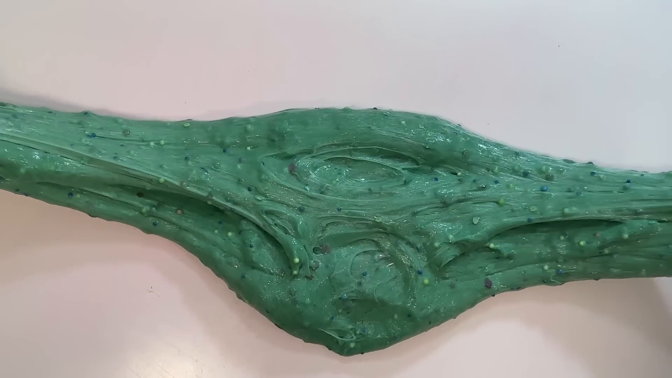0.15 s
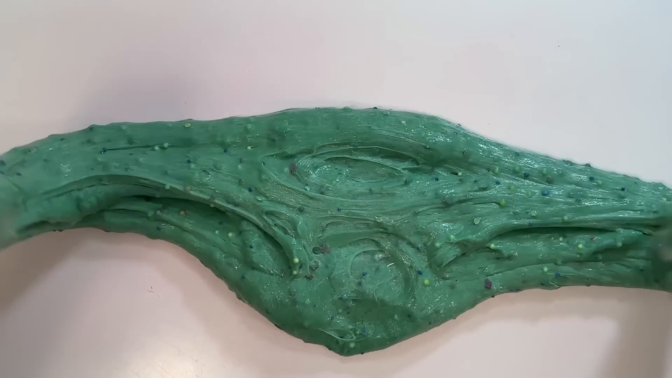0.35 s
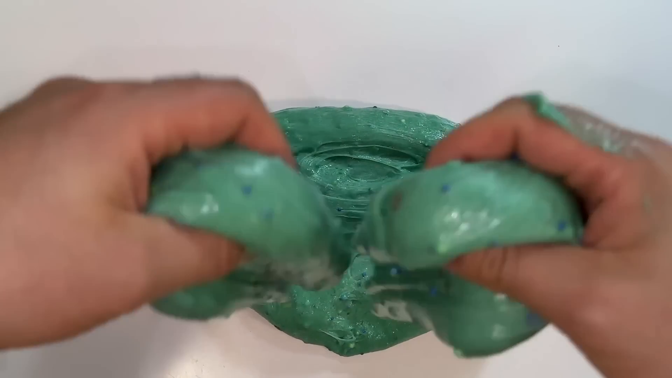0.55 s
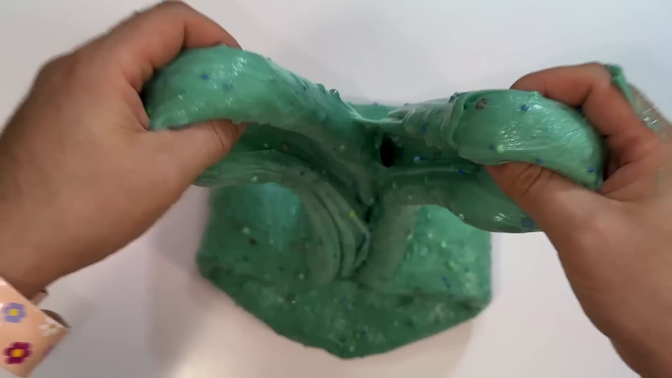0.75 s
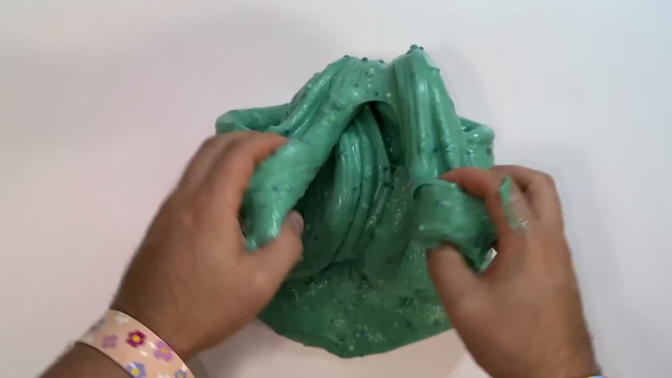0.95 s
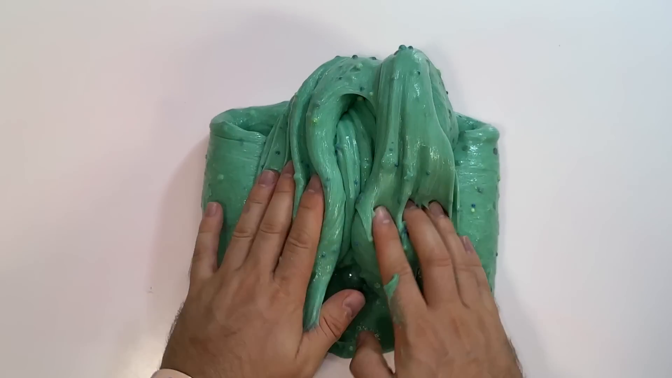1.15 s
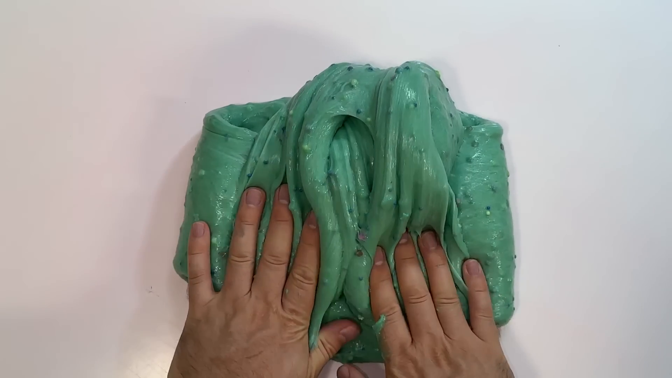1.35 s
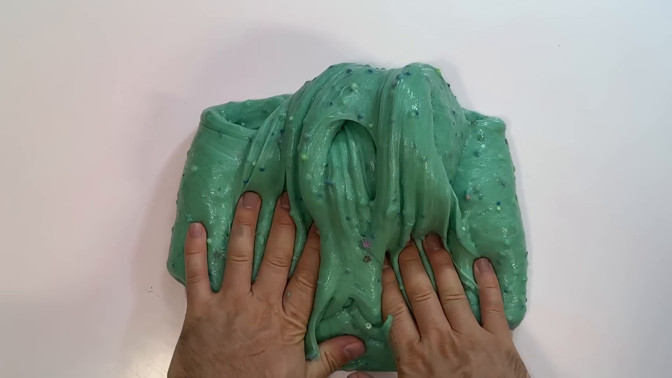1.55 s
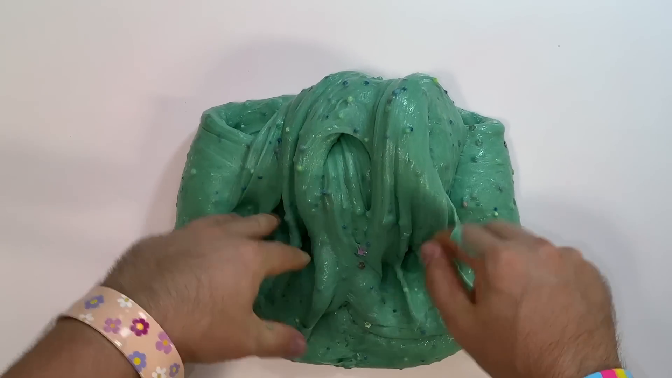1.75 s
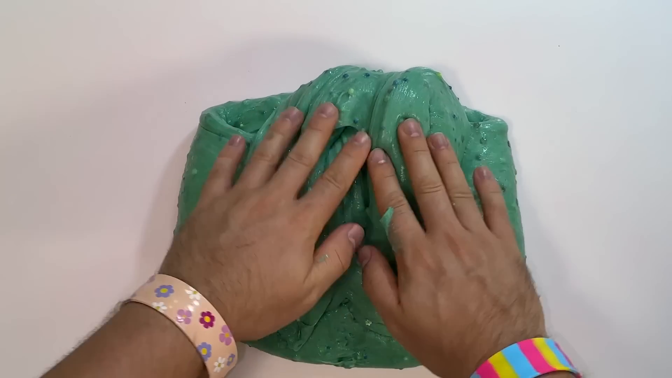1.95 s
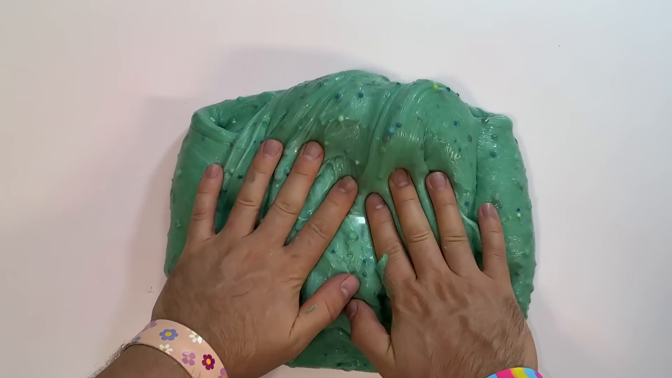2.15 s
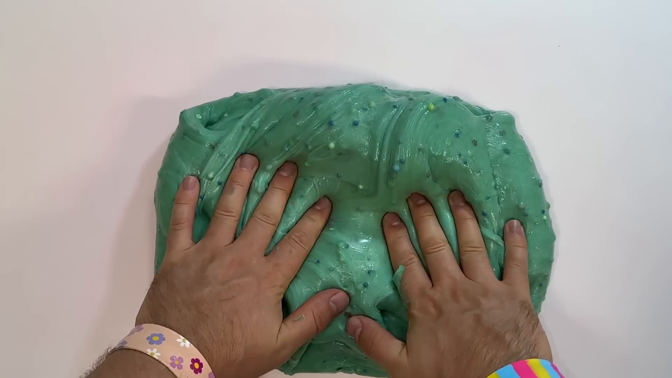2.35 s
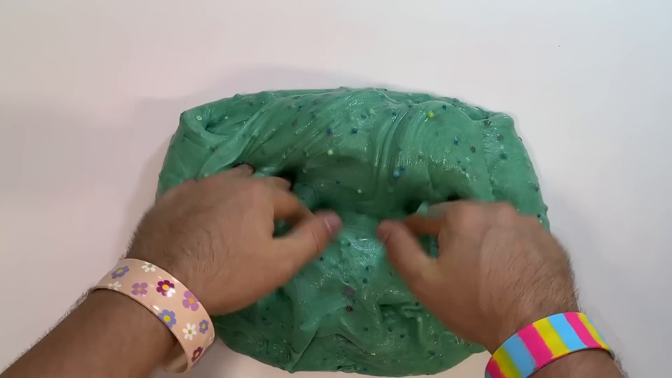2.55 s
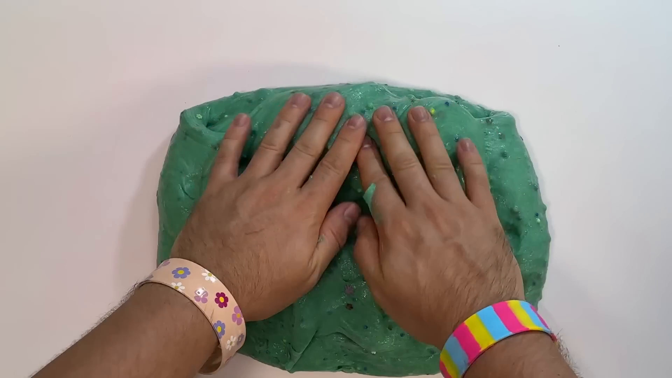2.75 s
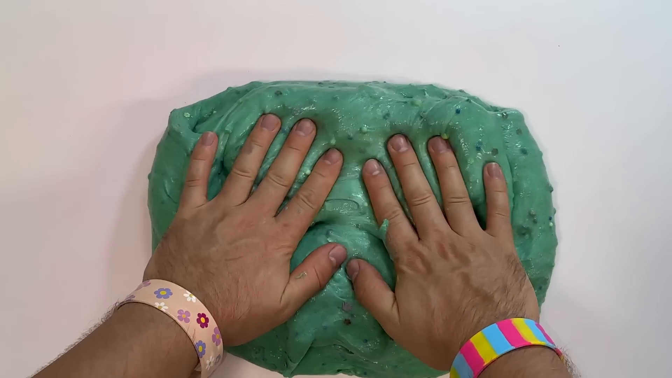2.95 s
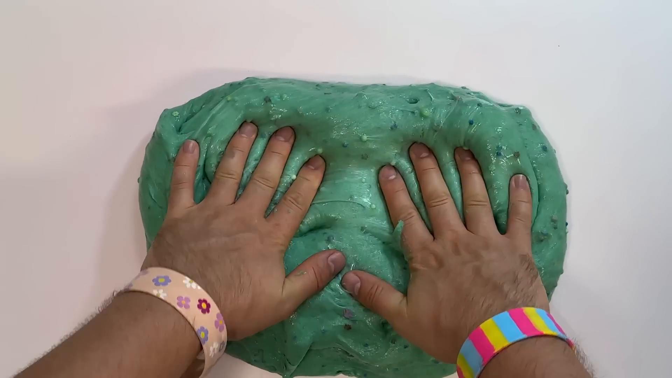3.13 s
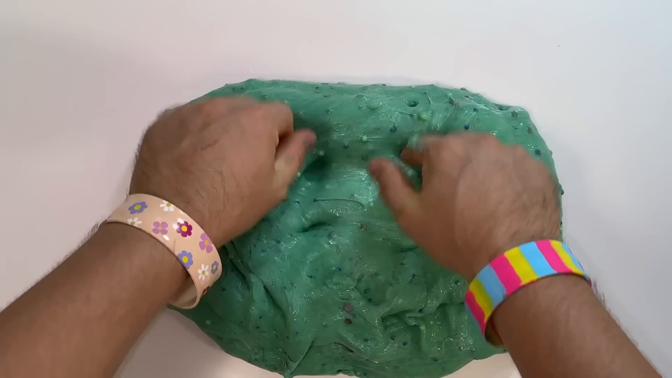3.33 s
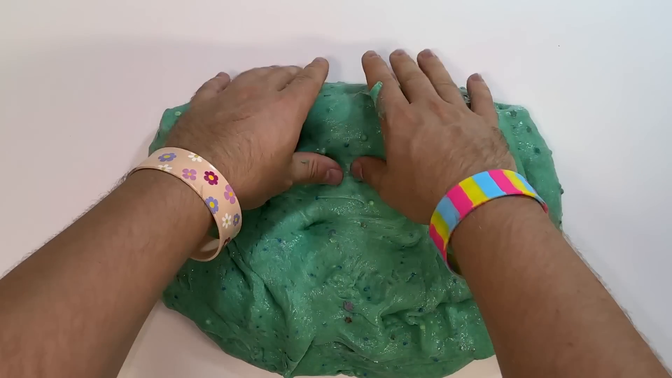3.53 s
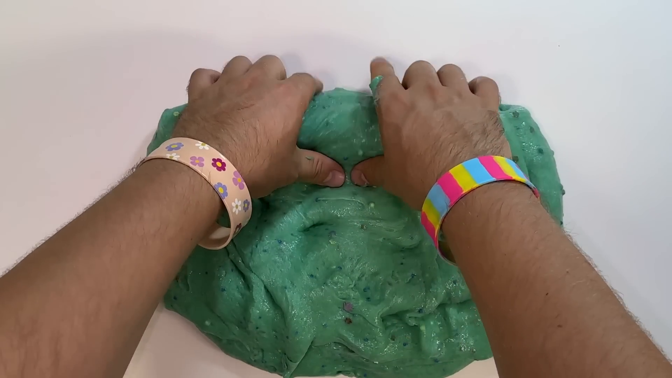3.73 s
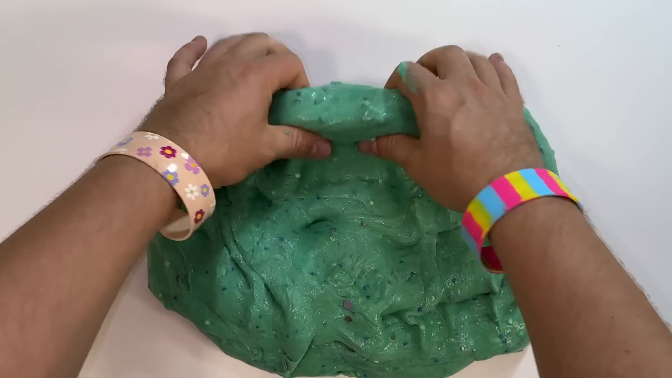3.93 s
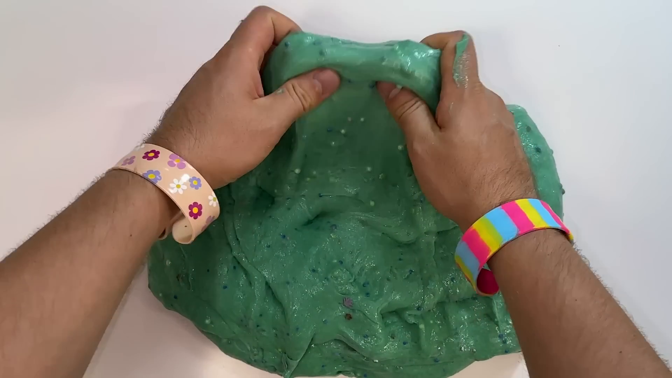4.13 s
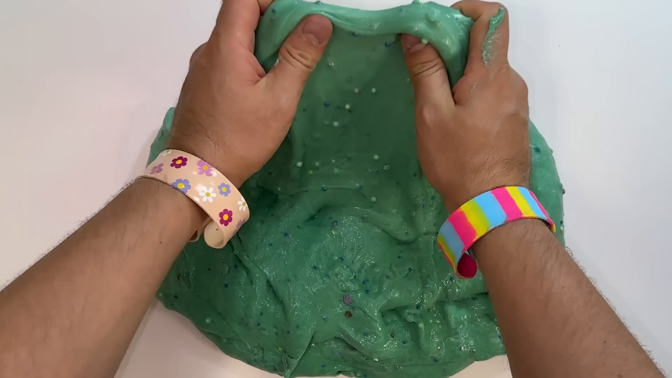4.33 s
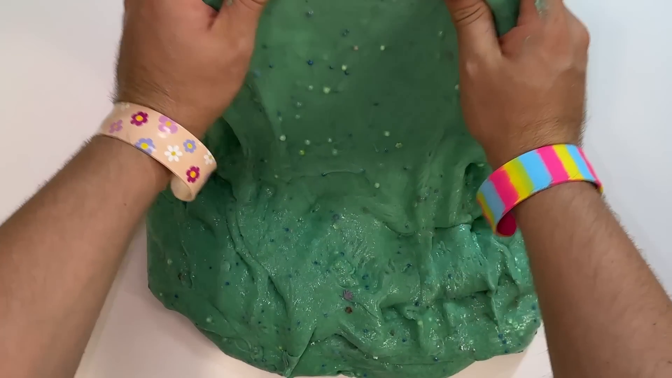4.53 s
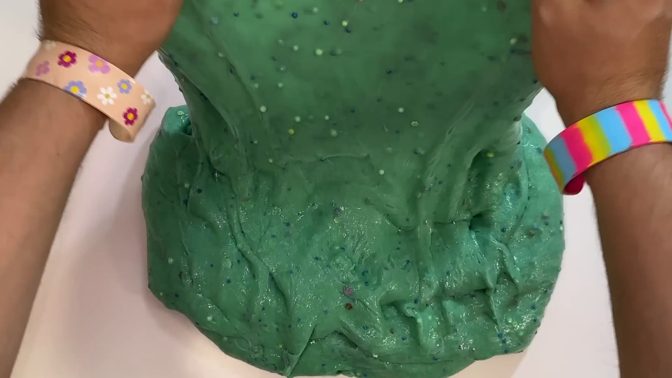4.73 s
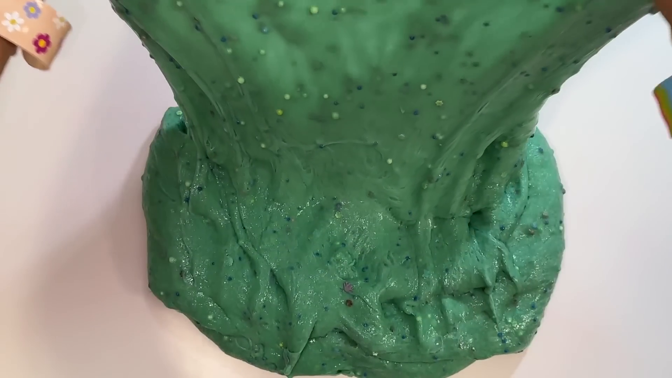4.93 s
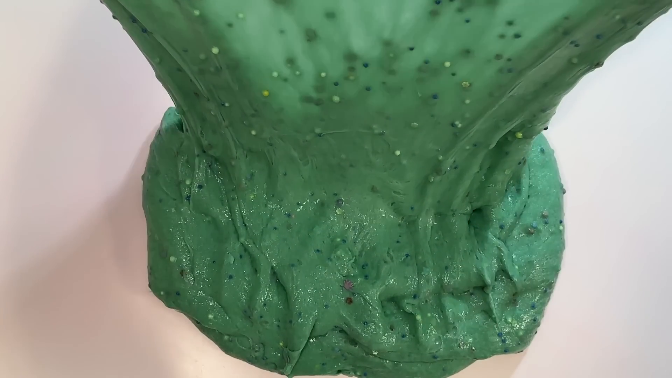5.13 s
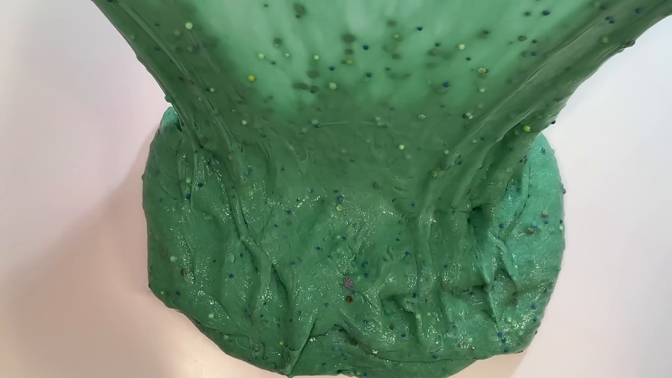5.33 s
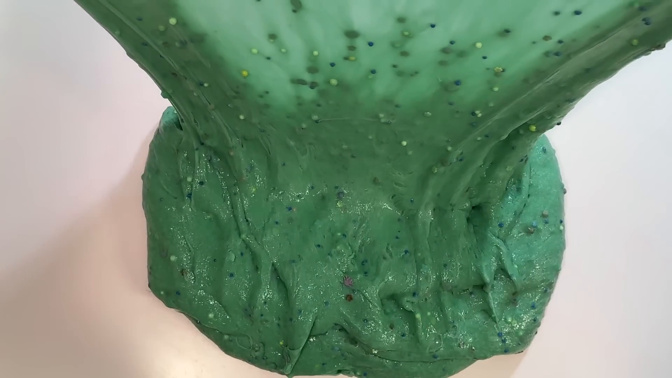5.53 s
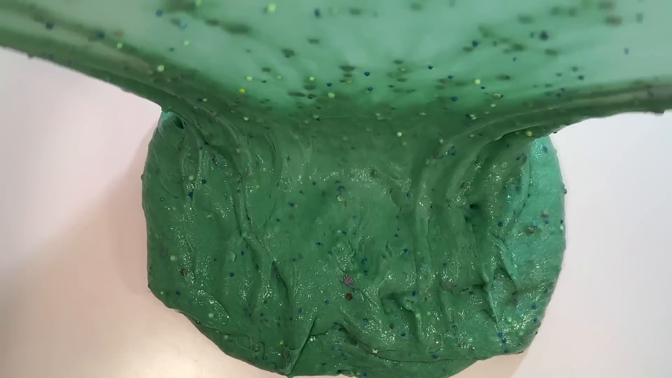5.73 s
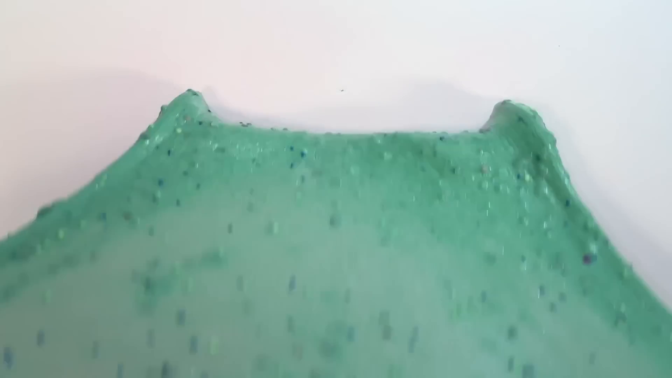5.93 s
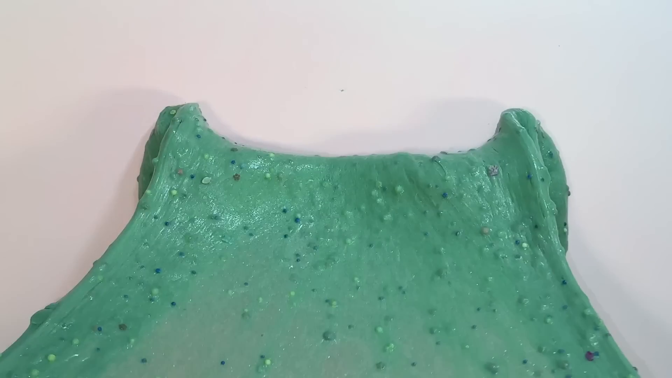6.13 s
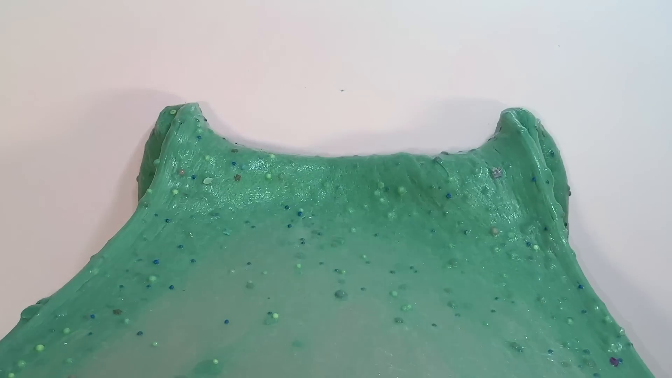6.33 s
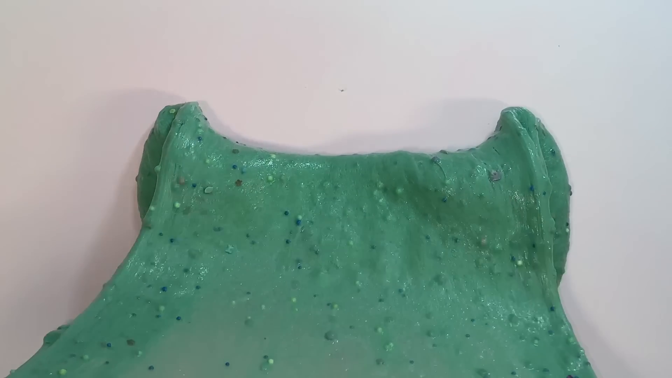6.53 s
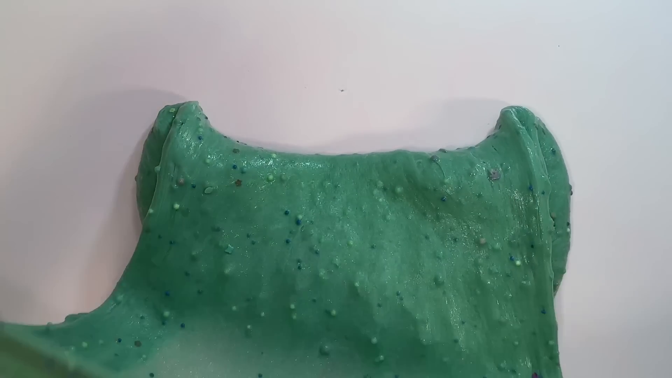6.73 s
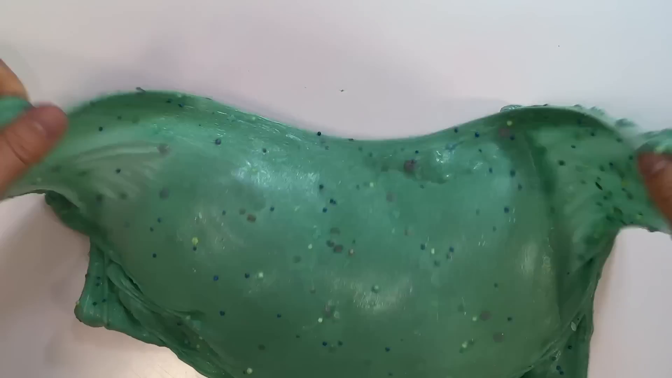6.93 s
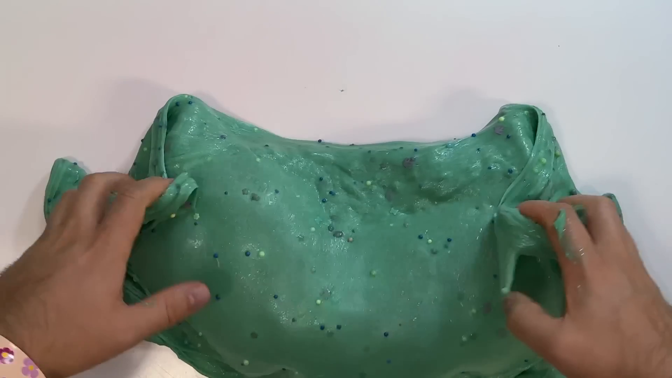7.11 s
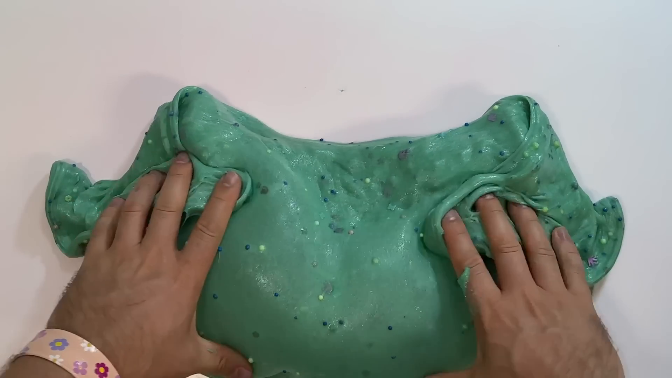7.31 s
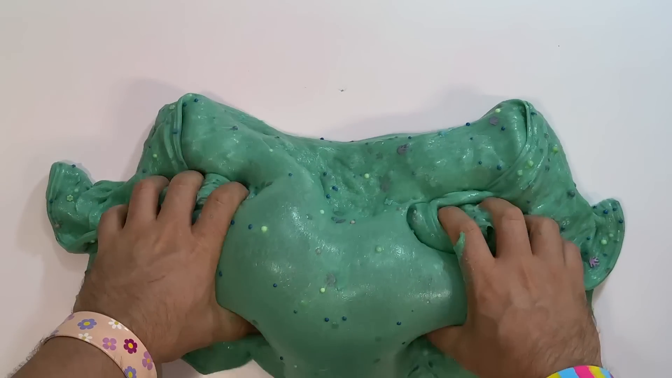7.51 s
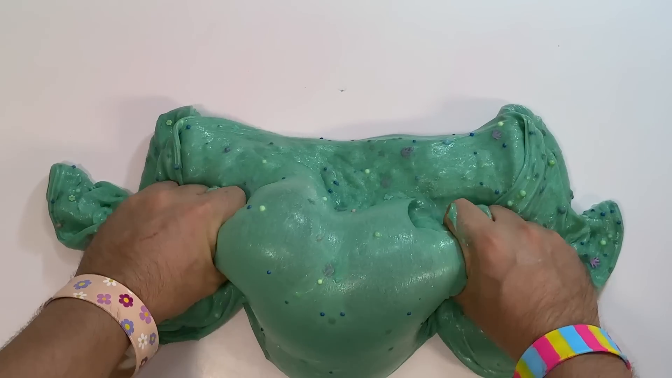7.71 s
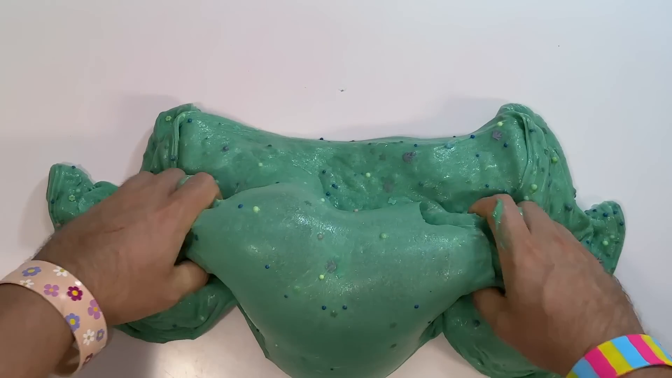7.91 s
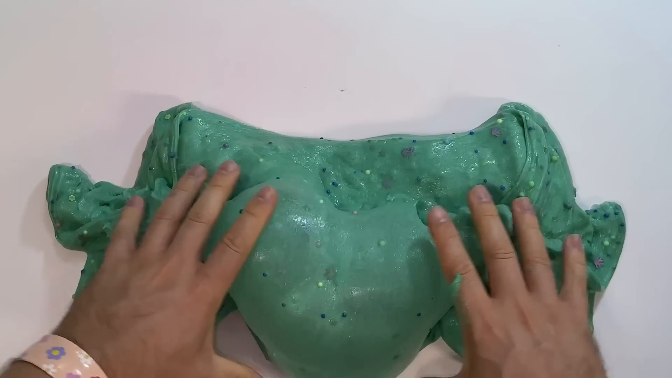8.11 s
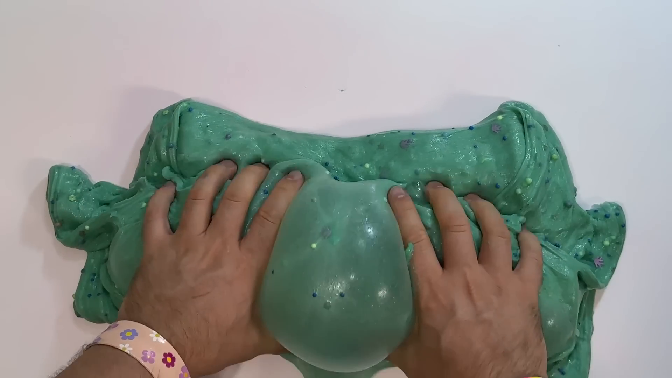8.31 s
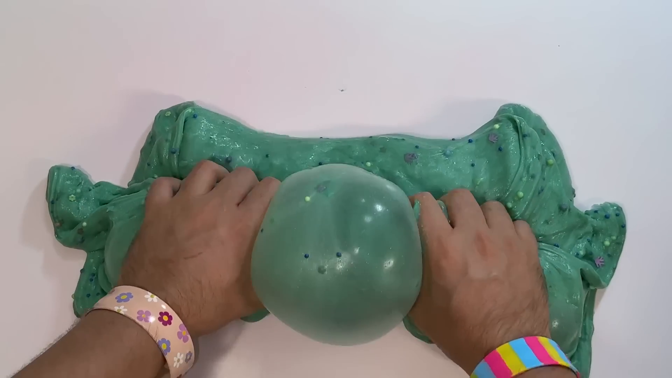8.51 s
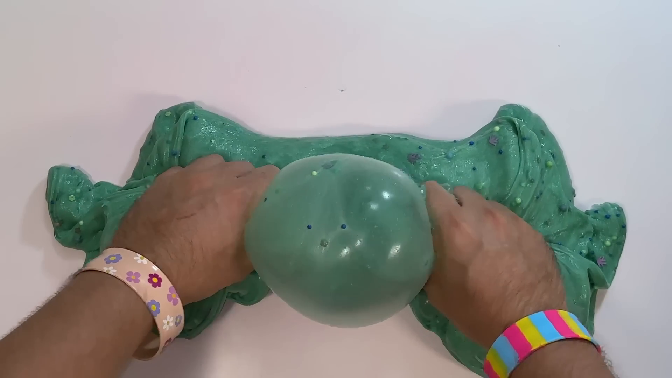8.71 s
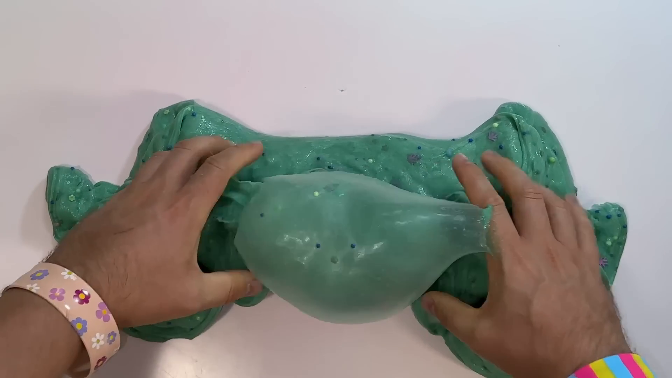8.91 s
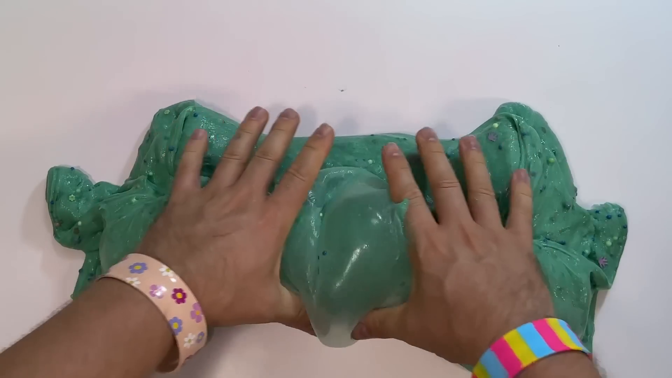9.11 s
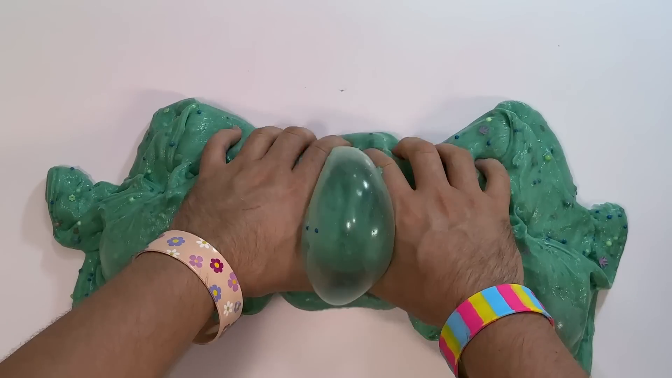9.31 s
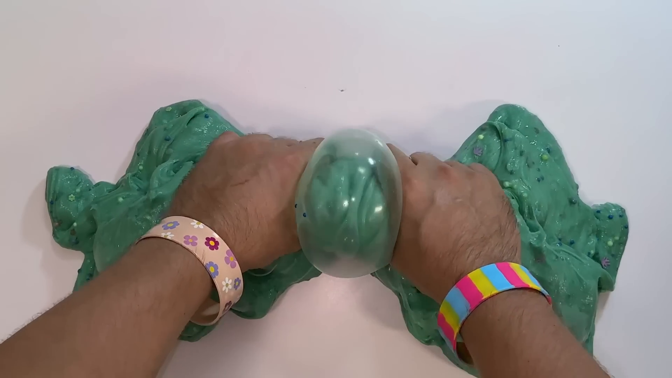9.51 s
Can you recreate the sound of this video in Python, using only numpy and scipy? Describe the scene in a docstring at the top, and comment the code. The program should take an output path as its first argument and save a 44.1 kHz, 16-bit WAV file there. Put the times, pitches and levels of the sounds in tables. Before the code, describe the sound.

Hands knead and stretch sticky beaded slime on a table, with wet crackles, soft squelches and plops, then very loud sharp air-bubble pops near the end.

```python
"""Two hands fold, press and stretch a soft foamy slime on a table in a quiet room.
Peeling sticky skin fizzes with tiny bubbles, made of random clicks and short rings; larger folds squelch.
Trapped air pockets burst with sharp ringing pops, and sliding folds colour their crackle in a hollow.
Fingers pulling out of their holes plop: a dying tone roughened by a puff of air.
Close microphones add hiss and rumble; the room adds an echo, a whine, a drone and a passing hum."""
import sys
import numpy as np
from scipy import signal
from scipy.fft import rfft, irfft, next_fast_len
from scipy.io import wavfile

SR = 44100
rng = np.random.default_rng(int(sys.argv[2]) if len(sys.argv) > 2 else 0)


def wav_record(signal):
    """Record a signal, one row per channel, as 16-bit PCM in the file named by sys.argv[1]."""
    frames = np.transpose(np.atleast_2d(signal))
    bounded = np.clip(frames, -1, 1)
    # unit amplitude maps onto the largest positive 16-bit level
    quanta = np.round(bounded * 32767).astype(np.int16)
    wavfile.write(sys.argv[1], SR, quanta)


N = 421596


def from_db(db):
    """Turn decibels into gain."""
    return 10 ** (np.asarray(db) / 20)


def rms_one(x):
    """Scale a sound so that its average strength (rms) is 1."""
    return x / np.sqrt(np.mean(x ** 2) + 1e-20)


def in_time(rows):
    """Turn table columns into curves with one value per sample."""
    s, *columns = np.transpose(rows)
    return [np.interp(np.arange(N) / SR, s, column) for column in columns]


def at_hz(points, hz):
    """Read a table of points at any frequency, along a log-frequency axis."""
    table_hz, value = np.transpose(points)
    return np.interp(np.log(hz), np.log(table_hz), value)


def drift(rate_hz):
    """Slow random wandering with spread 1: noise smoothed twice, made once every 40 samples."""
    r = np.exp(-2 * np.pi * rate_hz * 40 / SR)
    noise = rng.standard_normal(N // 40 + 2002)
    slow = signal.lfilter([1], [1, -2 * r, r * r], noise)[2000:]   # skip the filter's start-up
    return np.interp(np.arange(N) / 40, np.arange(len(slow)), rms_one(slow))


def ring(clicks, hz, t60_s):
    """Each click sets off a sine wave as high as the click, which falls by 60 dB in t60_s."""
    r, w = from_db(-60 / (t60_s * SR)), 2 * np.pi * hz / SR
    return signal.lfilter([0, np.sin(w)], [1, -2 * r * np.cos(w), r * r], clicks + 1e-18)


def grains(per_s, spread_db):
    """Random clicks of uneven size and sign, like many tiny breaks in the skin."""
    sizes = from_db(spread_db * np.minimum(rng.exponential(1, N), 5))
    sizes = sizes * rng.choice([-1, 1], N)
    return rms_one(sizes * (rng.random(N) < per_s / SR))


def stereo(mid, side, spectrum, alike):
    """Colour two streams and mix them so that left and right agree as far as asked; rms 1."""
    size = next_fast_len(N)
    hz = np.maximum(np.fft.rfftfreq(size, 1 / SR), 1)
    likeness = np.clip(at_hz(alike, hz), -1, 1)
    m = rfft(mid, size) * np.sqrt(1 + likeness)
    s = rfft(side, size) * np.sqrt(1 - likeness)
    colour = from_db(at_hz(spectrum, hz))
    return rms_one(irfft(colour * np.array([m + s, m - s]), size)[:, :N])


def dying(times_s, levels_db, t60_s):
    """A gain that jumps up at each time and falls by 60 dB in t60_s."""
    starts = np.zeros(N)
    starts[(np.asarray(times_s) * SR).astype(int)] = from_db(levels_db)
    return signal.lfilter([1], [1, -from_db(-60 / (t60_s * SR))], starts + 1e-18)


# The slime creeping between strokes: start_s, fizz_db
CREEP = [(0.0, -88), (.4, -79), (3.5, -80), (4.2, -74.5), (5.0, -82.5), (5.5, -83.5), (6.8, -83),
         (7.3, -74.5), (9.56, -77)]
CREEP_SQUELCH_DB, CREEP_THUD_DB = -2.5, -1.5   # against the creeping fizz
# Each press, pull or peel of the hands, with its levels halfway through:
# start_s, length_s, swell_db (change over its length), fizz_db, squelch_db, thud_db
STROKES = [(0.423, 0.21, 4, -67.5, -68.5, -62), (0.722, 0.15, -10, -75, -72.5, -74),
           (0.911, 0.21, 1.5, -65, -68, -73), (1.257, 0.19, -2, -77, -70.5, -71),
           (1.6, 0.15, 6, -52, -55.5, -56.5), (2.003, 0.05, 13, -75, -83, -75),
           (2.135, 0.3, -7, -80, -74.5, -79), (2.433, 0.061, -1, -59.5, -64.5, -60.5),
           (2.517, 0.047, -3, -49.5, -59, -55.5), (2.755, 0.24, -0.5, -76, -70, -67),
           (3.145, 0.069, -5, -66, -69.5, -67.5), (3.217, 0.12, 2.5, -52.5, -58.5, -54.5),
           (3.618, 0.16, 11, -68.5, -67, -67), (3.803, 0.11, 0, -63.5, -68, -63.5),
           (3.932, 0.087, -2.5, -66, -66.5, -66), (4.872, 0.14, -13, -69.5, -84, -75),
           (6.065, 0.026, -1, -72.5, -72.5, -78), (6.876, 0.04, 11, -65.5, -63, -63.5),
           (6.968, 0.053, -9, -55.5, -53, -57), (7.069, 0.1, 0, -58.5, -65.5, -67.5),
           (7.325, 0.14, -2, -94, -73, -65), (7.517, 0.025, -6, -76, -64.5, -73),
           (7.547, 0.1, 3.5, -58, -56, -57), (7.671, 0.1, -7, -61, -58.5, -62.5),
           (7.885, 0.13, -1, -49.5, -52.5, -53), (8.219, 0.14, 14, -84, -72, -78),
           (8.388, 0.19, 17, -60.5, -62, -58.5), (8.59, 0.15, -8, -50, -61, -61.5),
           (8.797, 0.14, -8, -53, -56.5, -55.5), (9.216, 0.19, 22, -73, -69.5, -71),
           (9.453, 0.16, 10, -62, -57.5, -57)]
GRIP_DB_PER_S, LET_GO_DB_PER_S = 511, 258   # how fast a stroke comes up and dies away
FIZZ_STOP_DB_PER_S = 200   # the fizz dies away faster by this
THUD_LAG_S, THUD_SWELL_DB = 0.01, 0.5   # the table shakes most once the hands sink through


def strokes():
    """Gain of fizz, squelch and thud: each stroke rises, swells or sags, then dies away into the creep."""
    t = np.arange(N // 40 + 1) * 40 / SR
    creep_db = np.interp(t, *np.transpose(CREEP))
    power = from_db(creep_db + np.array([[0], [CREEP_SQUELCH_DB], [CREEP_THUD_DB]])) ** 2
    for s, length, swell_db, *levels_db in STROKES:
        held = np.clip((t - s) / max(length, .01), 0, 1)
        before, after = np.maximum(s - t, 0), np.maximum(t - s - length, 0)   # seconds
        squelch_db = swell_db * (held - .5) - GRIP_DB_PER_S * before - LET_GO_DB_PER_S * after
        fizz_db = squelch_db - FIZZ_STOP_DB_PER_S * after
        thud_db = np.interp(t - THUD_LAG_S, t, squelch_db + THUD_SWELL_DB * (held - .5))
        power += from_db([fizz_db, squelch_db, thud_db] + np.array(levels_db)[:, None]) ** 2
    return [np.interp(np.arange(N) / SR, t, gain) for gain in np.sqrt(power)]


def bubbles(per_s, low_hz, high_hz, cycles, patchy_db):
    """Squeezed-out air bubbles ring a few cycles at a pitch set by their size; sizes come in bouts."""
    clicks, size_group = grains(per_s, 4.0), rng.integers(0, 14, N)
    out = np.zeros(N)
    for k, hz in enumerate(np.geomspace(low_hz, high_hz, 14)):
        bout = from_db(patchy_db * drift(8.3))
        out += ring(clicks * (size_group == k) * bout, hz, cycles / hz)
    return rms_one(out)


# Tone colour of the tiny bubbles, larger folds and shaken table: pitch_hz, relative_level_db (per Hz)
FIZZ_COLOUR = [(1470, -13.5), (2500, -13.5), (3860, -2.5), (4910, -2), (6700, 0), (8400, -3.5),
               (11900, -2.5), (16000, -4.5)]
SQUELCH_COLOUR = [(600, -26), (1000, -2), (1600, -2), (2900, -4), (3500, -5.5), (4300, -14.5),
                  (6000, -34.5)]
THUD_COLOUR = [(47, -43), (80, 2.5), (194, 1), (454, -2), (742, -12), (878, -5.5), (1030, -30), (1400, -9),
               (1820, -39)]
# How alike left and right are for the nearby slime: pitch_hz, likeness (1 is the same, 0 unrelated)
NEAR_ALIKE = [(60, 0.15), (240, 1), (950, 1), (3770, 0.85), (15000, 0.3)]
# Torn skin crackles on after each burst; levels are against the burst
TEAR_FIZZ_DB, TEAR_SQUELCH_DB, TEAR_T60_S = -29, -34, 0.16
TEAR_SPLIT_HZ, TEAR_CRISP_DB = 8300, -7   # above the split, crackle follows the burst's crispness
# The harder the stroke, the duller its fizz: dB of crispness lost per dB above the even level
HARD_PRESS_DULLS, EVEN_AT_DB = 0.086, -71


def kneading():
    """Tiny bubbles fizz and tick, larger folds squelch, and the pressing hands shake the table."""
    fizz_gain, squelch_gain, thud_gain = strokes()
    s, burst_db, body_db, crisp_db, _ = np.transpose(BURSTS)
    tear_db = burst_db + TEAR_FIZZ_DB
    dull_tear = dying(s, tear_db, TEAR_T60_S)
    crisp_tear = dying(s, tear_db + crisp_db + TEAR_CRISP_DB, TEAR_T60_S)
    squelch_gain = squelch_gain + dying(s, burst_db + body_db + TEAR_SQUELCH_DB, TEAR_T60_S)
    clumps_db = 1.66 * drift(42)   # the sticky skin lets go in patches

    fizz = stereo(grains(9000, 2.8), grains(8400, 2.6), FIZZ_COLOUR, NEAR_ALIKE)
    fizz += from_db(-13.5) * bubbles(84, 4100, 20000, cycles=16.0, patchy_db=10.0)   # ticks
    squelch = stereo(grains(5000, 3.9), grains(5000, 2.5), SQUELCH_COLOUR, NEAR_ALIKE)
    squelch += from_db(-6.0) * bubbles(600, 701, 4200, cycles=18.6, patchy_db=6.5)
    thud = stereo(grains(1200, 2.6), grains(1500, 3.9), THUD_COLOUR, NEAR_ALIKE)

    dull = signal.lfilter(*signal.butter(2, TEAR_SPLIT_HZ, "low", fs=SR), fizz)
    crisp = signal.lfilter(*signal.butter(2, TEAR_SPLIT_HZ, "high", fs=SR), fizz)
    crisp_gain = fizz_gain * (from_db(EVEN_AT_DB) / fizz_gain) ** HARD_PRESS_DULLS
    # minus, so that the two halves do not cancel where they meet
    out = (dull * (fizz_gain + dull_tear) - crisp * (crisp_gain + crisp_tear)) * from_db(clumps_db)
    out += squelch * (squelch_gain * from_db(clumps_db + 1.08 * drift(24)) + smacks())
    return out + thud * thud_gain * from_db(3.25 * drift(8.3))


# Tone colour of the microphone hiss and of the rumble: pitch_hz, relative_level_db (per Hz)
HISS_COLOUR = [(71, -17.5), (120, -1), (355, -14.5), (656, -16.5), (1010, -18), (1290, -22.5), (14400, -24),
               (16000, -22)]
RUMBLE_COLOUR = [(12, 1.5), (22, 10.5), (33, -5), (48, 5.5), (57, -6.5), (66, -1), (80, -8), (105, -27.5),
                 (135, -15), (200, -61)]
# How alike left and right are in hiss and rumble: pitch_hz, likeness (below 0 they move oppositely)
ROOM_ALIKE = [(130, 0.38), (1400, 0), (15000, 0)]
RUMBLE_ALIKE = [(25, 0.46), (60, -0.55), (120, -0.37)]
# Air moving over the microphones and building rumble, before the left-right tilt: start_s, level_db
WAFT = [(0.0, -67), (0.16, -57), (3.9, -56), (4.23, -57.5), (6.87, -58.5), (6.97, -50), (7.22, -48),
        (7.53, -60.5), (8.71, -53), (8.73, -61), (9.43, -53.5), (9.56, -72)]
# A low hum that rises in pitch, then fades; its level also wanders: start_s, pitch_hz, level_db
HUM = [(3.85, 181, -88), (4.0, 182.5, -73), (4.85, 195.4, -75), (5.15, 202, -95)]
HISS_DB, RUMBLE_RIGHT_DB = -67, 5   # rumble and drone: right above left
WHINE_HZ, WHINE_DB = 1033, -87.5
DRONE_HZ, DRONE_DB, DRONE_LEAD = 65.7, -62.5, 1.17   # level before the tilt; radians the left leads


def background():
    """Microphone hiss, rumble and drone stronger on the right, a thin whine and a passing hum."""
    white = rng.standard_normal((4, N))
    turns = 2 * np.pi * np.arange(N) / SR
    hiss = from_db(HISS_DB + .5 * drift(3.5)) * stereo(*white[:2], HISS_COLOUR, ROOM_ALIKE)
    rumble = from_db(in_time(WAFT)[0]) * stereo(*white[2:], RUMBLE_COLOUR, RUMBLE_ALIKE)
    whine = from_db(WHINE_DB + 1.5 * drift(8)) * np.sin(WHINE_HZ * turns)
    hum_hz, hum_db = in_time(HUM)
    hum = from_db(hum_db + 1.52 * drift(6)) * np.sin(2 * np.pi * np.cumsum(hum_hz) / SR)
    drone_phase = DRONE_HZ * turns + 0.58 * drift(3) + [[DRONE_LEAD], [0]]
    drone = from_db(DRONE_DB + 2.3 * drift(1.7)) * np.sin(drone_phase)
    tilt = from_db([[-RUMBLE_RIGHT_DB / 2], [RUMBLE_RIGHT_DB / 2]])
    return hiss + (rumble + drone) * tilt + whine + hum


ROOM_T60_S, ROOM_DB = 0.49, -25.5
WALL_CUT_CYCLES = 725   # a path's treble cut in Hz is this divided by its delay in seconds


def room(x):
    """Echo from eight repeating delays a side, each round quieter and duller."""
    size = next_fast_len(N + SR)
    hz = np.fft.rfftfreq(size, 1 / SR)
    source, out = rfft(x, size), np.zeros((2, len(hz)), complex)
    lags_s = np.geomspace(.003, .028, 16) * rng.uniform(0.85, 1.08, 16)
    for k, lag in enumerate(lags_s):
        one_round = from_db(-60 * lag / ROOM_T60_S) * np.exp(-2j * np.pi * hz * lag)
        one_round = one_round / (1 + 1j * hz * lag / WALL_CUT_CYCLES)
        out[k % 2] += source * one_round / (1 - one_round) * (-1) ** (k // 2)
    return irfft(out, size)[:, :N]


# Air pockets bursting: start_s, level_db, body_db and crisp_db (both against level_db),
# pan_db (left above right)
BURSTS = [(0.4884, -49, -1, 8.5, -7), (0.5822, -44, 11, -1, -2), (0.6037, -45.5, -16, 13.5, -3),
          (0.6755, -46.5, 0, 2, -1), (0.757, -48, -2, -12, 1), (0.811, -53, 10, -3, -3),
          (0.835, -50, -15, -1, 0), (0.986, -46.5, 0, 2, 1), (1.029, -57, -4, -10, 0),
          (1.165, -49, -12, -3, 0), (1.186, -54, -15, -8, 0), (1.205, -50, -15, -5, 0),
          (1.228, -55, -15, 10, 1), (1.264, -60, 13, -5, 0), (1.2992, -42, -4, -2, -1),
          (1.3179, -33.5, -18, 5.5, -4), (1.342, -53, 12, 4, 0), (1.3554, -43, -11, -3, -1),
          (1.4024, -50, 2, 15, -6), (1.4042, -45.5, 0, 15.5, -2), (1.412, -51, -1, 15, -6),
          (1.4713, -34.5, -14, 13.5, 0), (1.587, -45, -8, -7, -3), (1.6015, -42, -7, -3, -3),
          (1.6205, -32.5, -3, 1, -5), (1.6305, -29, -6, -12, -7), (2.1643, -43, 1, 4, -2),
          (2.21, -49, -15, 4, -3), (2.2637, -56, -13, 15.5, 1), (2.326, -48, -8, -6, -4),
          (2.773, -43, 6, -4, -2.5), (2.799, -44, 6, -2, -8), (2.881, -53.5, -7, 14, 0.5),
          (2.9797, -48, -7, 8, 0), (3.0175, -49.5, 2, 7.5, -3), (3.037, -47, 7, -4, -3),
          (3.1376, -39, 1, -2, -5), (3.212, -50.5, 15, 16, -2), (3.5574, -46.5, -1, 5.5, -4),
          (3.678, -44, 9, 9, -3), (3.7168, -47.5, -9, 13.5, -1.5), (3.7419, -44, -1, -5, -4),
          (3.801, -37, 2.5, 0, -5.5), (4.055, -44.5, 6, 4, -2), (4.139, -55, 8, -4, 3),
          (4.393, -57, -8, 16, -1.5), (4.863, -35, -6, -3, -5), (4.9245, -42.5, -15, -4, 11),
          (5.212, -61, -10, 13.5, 2), (5.4926, -65, -10, 24, 10), (5.6998, -50.5, -1, 14, -6.5),
          (5.8042, -48, -3, 4.5, 1), (6.0734, -55, 1, -4, -13), (6.871, -47, -17, 10.5, -6),
          (6.895, -59, 16, -3, -4), (6.912, -39, 3, -8, 3.5), (6.961, -32, -11, -12, -1),
          (6.972, -37, -13, 10, -1), (6.979, -47, 3, -3, -3), (7.072, -43, -21, 13, -2),
          (7.158, -43, -15, -10, 3), (7.427, -56, -2, 14.5, 2), (7.5577, -30, -24, -20, -6),
          (7.657, -28, 4, -15, -3.5), (7.6923, -25, -23, 7, 2), (7.712, -36.5, 7, 12.5, 0.5),
          (7.885, -37, -17, -13, 3), (8.25, -51.5, 10.5, 10.5, -2), (8.318, -45, 9.5, -3, -1),
          (8.338, -46, 5, -6, 0), (8.373, -23.5, -6.5, -1, 0.5), (8.4001, -37, -2, -14, -2),
          (8.446, -23, -3, 3.5, 0.5), (8.4997, -27, 7, -24, -0.5), (8.536, -42, -8, -4, 2),
          (8.5565, -6.5, -1, -7, -2.5), (8.5843, -14.5, 2, 2, -3), (8.624, -27, -3, -13, -7),
          (8.6263, -2, -10.5, -4, 0.5), (8.6867, -29, 5.5, -12, -2), (8.928, -31, -12, -16, -1),
          (8.9348, -37, -3.5, -16, -3), (9.213, -52, 7.5, 3, -3), (9.234, -60, 10, -6, 1),
          (9.241, -55, -16, 14, -1), (9.251, -40, -18, 9.5, -2), (9.275, -51, 8, -3, -2),
          (9.2858, -38, 5.5, 16, 0), (9.3135, -48, -7, 15, 6), (9.3205, -40, -10, 2, -4),
          (9.3506, -16.5, -6.5, 4.5, -0.5), (9.407, -50, -8, -6, 0), (9.4526, -42, -1, 14, -1.5),
          (9.48, -23.5, -11, -4.5, -1), (9.4864, -38, -21, -5, -2), (9.5029, -33, -16, 2, -3),
          (9.5219, -16.5, -2, 1, -1.5), (9.5352, -30, 12, 23, -4), (9.5359, -16.5, -1, 13.5, 0.5)]
# What a burst rings with: pitch_hz, t60_s (time to fall 60 dB), relative_level_db,
# part (fraction dropped: 0 body, 1 middle, 2 crisp)
BURST_RINGS = [(1000, 0.0034, -12.5, 0), (1700, 0.0029, -10, 0), (2840, 0.0022, -1, 0),
               (4200, 0.0016, 0.5, 1), (6350, 0.0021, 2, 1), (8560, 0.0015, 0.5, 2),
               (11070, 0.0012, 1.5, 2), (14700, .001, -4, 2.3)]
POCKET_SCATTER, SHRED_DB = 0.031, -21   # pockets differ in size, so in pitch; shreds against the tear
TABLE_ECHO_S, TABLE_ECHO_DB = (0.00096, .0012), -16.5   # left, right


def pops():
    """Each burst is a sharp tear with shreds after it, ringing briefly by its size, mirrored by the table."""
    s, burst_db, body_db, crisp_db, pan_db = np.transpose(BURSTS)
    hz, t60, ring_db, part = np.transpose(BURST_RINGS)
    chance = rng.standard_normal((len(s), 2, 120 + len(hz)))
    shreds = chance[..., :120] * from_db(SHRED_DB - 0.081 * np.arange(120))   # fading sample by sample
    shreds = .9 * shreds + .4 * shreds[:, :1]   # each side its own, plus some of the left's
    shreds[..., 0] = -1   # the tear itself

    part_db = np.transpose([burst_db + body_db, burst_db, burst_db + crisp_db])
    level_db = part_db[:, part.astype(int)] + ring_db
    t = np.arange(SR // 100) / SR
    pitch = hz * np.exp(POCKET_SCATTER * chance[:, 0, 120:])
    rings = from_db(level_db[..., None] - 60 * t / t60[:, None]) * np.sin(2 * np.pi * pitch[..., None] * t)
    rings = (rings * (-1) ** np.arange(len(hz))[:, None]).sum(axis=1)
    pan = from_db(pan_db[:, None] * [.5, -.5])[..., None]
    bursts = signal.fftconvolve(shreds, rings[:, None], axes=2) * pan

    right_lag = np.round(.4 + pan_db / 5).astype(int)   # samples: the far microphone hears it later
    out = np.zeros((2, N))
    for side, echo_s in enumerate(TABLE_ECHO_S):
        start = (s * SR).astype(int) + side * right_lag
        np.add.at(out[side], start[:, None] + np.arange(bursts.shape[2]), bursts[:, side])
        lag = int(echo_s * SR)
        out[side, lag:] += from_db(TABLE_ECHO_DB) * out[side, :-lag]
    return out


# Folds of slime holding air, coloured by their hollow while they slide:
# start_s, length_s, from_pitch_hz, to_pitch_hz, width_hz, level_db
FOLDS = [(0.54, .09, 3000, 2970, 350, -67), (0.58, 0.052, 855, 402, 600, -56),
         (1.068, 0.045, 2090, 3610, 497, -64.5), (3.696, 0.11, 2224, 2420, 600, -65),
         (6.916, 0.044, 743, 840, 300, -56), (6.969, 0.043, 1896, 1966, 400, -53),
         (6.97, 0.034, 1390, 1294, 300, -56), (7.876, 0.053, 2306, 2980, 504, -56),
         (7.922, 0.051, 952, 797, 352, -46), (7.923, .05, 305, 241, 151.4, -46),
         (7.943, 0.1, 2200, 2010, 350, -50), (7.963, 0.086, 2690, 3025, 350, -54),
         (8.758, 0.059, 2600, 2534, 400, -51), (8.749, .05, 3350, 3300, 300, -54.5),
         (8.817, 0.15, 2850, 3077, 450, -56), (8.821, 0.061, 1130, 900, 450, -55),
         (8.842, 0.13, 1930, 2180, 448, -58.5)]


def folds():
    """Crackle from a sliding fold rings in its hollow, whose pitch glides as it is squeezed."""
    out, crackle = np.zeros(N), grains(2900, 4.4) + 1j * grains(2500, 3.8)
    for s, length, from_hz, to_hz, width_hz, level_db in FOLDS:
        at, share = int(s * SR), np.linspace(0, 1, int(max(length, .01) * SR))
        rough = signal.lfilter(*signal.butter(2, width_hz / 2, fs=SR), crackle[at:at + len(share)])
        phase = 2 * np.pi * np.cumsum(from_hz + (to_hz - from_hz) * share) / SR
        hollow = rms_one((rough * np.exp(1j * phase)).real)   # moves the crackle up to the gliding pitch
        out[at:at + len(share)] += from_db(level_db) * np.sqrt(np.sin(np.pi * share)) * hollow
    return out


# Finger holes opening and soft slaps: start_s, level_db, start_pitch_hz,
# ring_s (time to fall 60 dB), smack_db (squelch level)
PLOPS = [(1.703, -34, 215, 0.042, -75), (1.716, -32, 224, 0.03, -70), (1.739, -34, 151, 0.072, -78),
         (2.134, -45, 362, 0.058, -60), (2.525, -33.5, 151, 0.046, -50), (2.557, -28, 150, 0.044, -70),
         (2.583, -33, 198, 0.037, -61), (2.773, -46.5, 1300, 0.016, -75), (2.773, -41.5, 2750, 0.0071, -72),
         (2.79, -41.5, 1400, 0.018, -66), (2.7985, -40, 1400, 0.014, -63), (2.7977, -36, 2730, 0.011, -63),
         (3.044, -45, 1180, 0.019, -58), (3.32, -37.5, 228, 0.088, -76), (3.753, -40.5, 416, 0.027, -57),
         (4.054, -46.5, 1000, 0.024, -59), (4.863, -39, 727, 0.011, -65), (5.51, -54, 126, 0.24, -90),
         (6.072, -60, 1060, 0.025, -63), (6.574, -55, 420, 0.05, -90), (6.911, -48, 517, 0.063, -53),
         (6.959, -37.5, 124, 0.054, -80), (6.961, -28.5, 380, 0.03, -58), (6.959, -30.5, 863, 0.029, -66),
         (6.971, -23.5, 780, 0.012, -56), (6.971, -32, 1400, 0.019, -70), (6.971, -32.5, 2580, 0.0081, -70),
         (7.232, -44.5, 864, 0.046, -65), (7.353, -46, 1230, 0.021, -85), (7.42, -45.5, 866, 0.039, -71),
         (7.578, -48, 1000, 0.078, -64), (7.885, -32.5, 367, 0.048, -79), (7.906, -44, 410, 0.05, -72),
         (7.929, -31, 510, 0.028, -45), (8.019, -45.5, 2050, 0.015, -49), (8.024, -40, 3050, 0.015, -67),
         (8.763, -41, 357, 0.11, -70), (8.773, -37.5, 2600, 0.02, -74), (8.797, -39, 392, 0.046, -66.5),
         (8.827, -37.5, 202, 0.1, -53.5), (8.849, -38, 201, 0.13, -48.5), (8.88, -41.5, 3150, 0.02, -73),
         (9.452, -32, 2160, 0.014, -52.5), (9.464, -34.5, 335, 0.034, -45), (9.498, -39, 2180, 0.012, -60),
         (9.536, -14, 1010, 0.0088, -40), (9.536, -17.5, 3730, 0.006, -42),
         (9.536, -14.5, 4950, 0.0061, -40), (9.538, -30.5, 348, 0.069, -48)]
PITCH_RISE_PER_S, PLOP_ROUGH = 0.86, 0.36   # rise as a share of the starting pitch
PUFF_S, PUFF_DB, PUFF_REACH = 0.0068, -7, 1.54   # the puff reaches up to this multiple of the pitch
PLOP_OPEN_CYCLES = 0.61   # a hole takes about this long to open


def plops():
    """A hole in the slime rings roughly like a short bottle, its pitch rising a little as it opens."""
    out, t = np.zeros(N + SR), np.arange(SR // 5) / SR
    for s, level_db, hz, ring_s, _ in PLOPS:
        air = rng.standard_normal(len(t))
        puff = rms_one(signal.lfilter(*signal.butter(3, PUFF_REACH * hz, fs=SR), air))   # air rushing in
        tone = np.sin(2 * np.pi * hz * t * (1 + PITCH_RISE_PER_S / 2 * t)) * (1 + PLOP_ROUGH * puff)
        tone += from_db(PUFF_DB) * puff * np.exp(-t / PUFF_S)
        opening = 1 - np.exp(-t * hz / PLOP_OPEN_CYCLES)
        at = int(s * SR)
        out[at:at + len(t)] += from_db(level_db - 60 * t / max(ring_s, .003)) * tone * opening
    return out[:N]


def smacks():
    """Wet skin parting at each plop: the gain of a sudden squelch that dies away."""
    s, *_, smack_db = np.transpose(PLOPS)
    return dying(s, smack_db, t60_s=0.064)


def scene():
    """The slime close by, its echo in the room, and the background."""
    slime = kneading() * from_db([[.4], [-.4]]) + pops() + plops() + folds()
    return slime + from_db(ROOM_DB) * room(slime.mean(axis=0)) + background()


OFFSET, CUTOFF_HZ = .0007, 15900


def record(dry):
    """A small constant offset is added, the loudest peaks overload flat, and the top treble is cut."""
    overloaded = np.clip(dry + OFFSET, -.86, .86)
    top_cut = signal.ellip(12, .3, 90, CUTOFF_HZ, fs=SR, output="sos")
    return signal.sosfilt(top_cut, overloaded)


dry = scene()
out = record(dry)
wav_record(out)
```